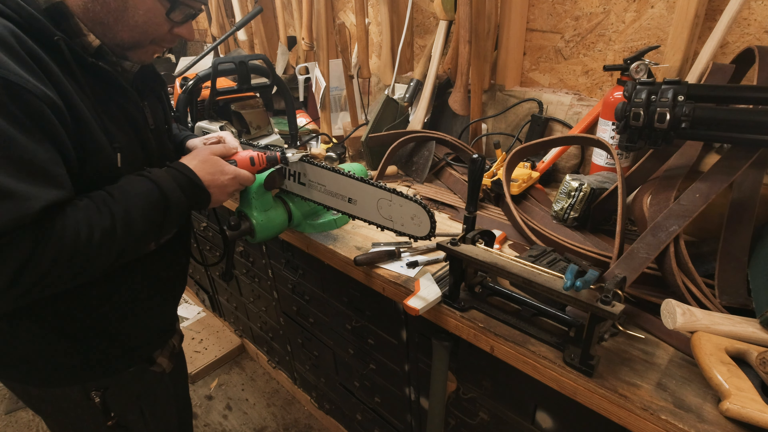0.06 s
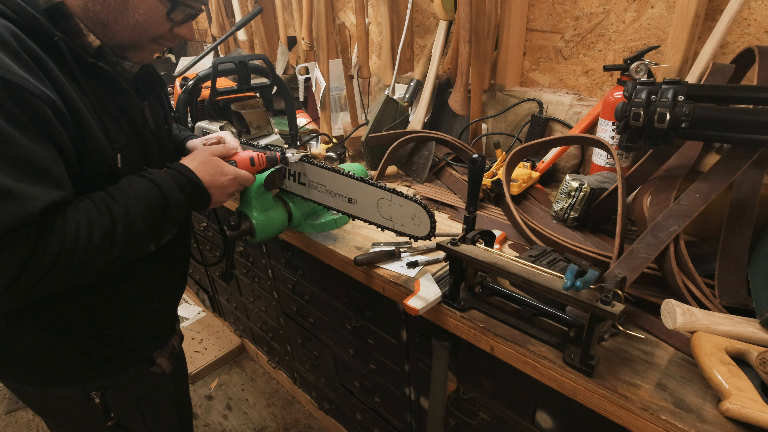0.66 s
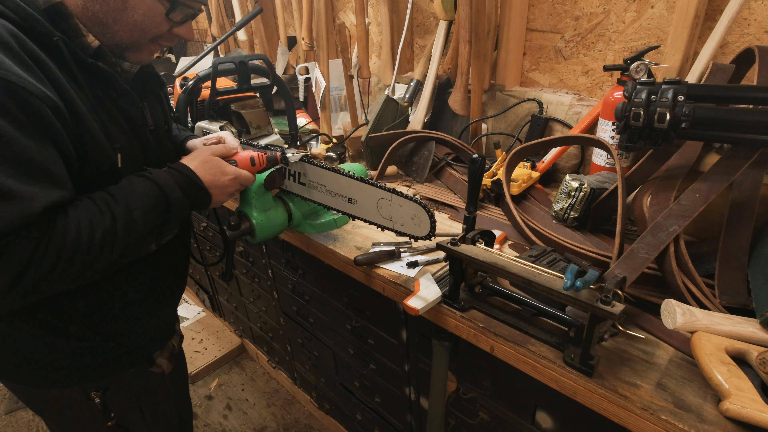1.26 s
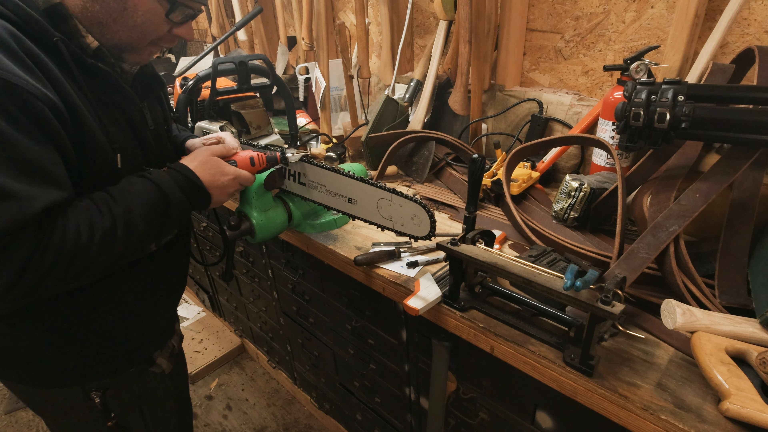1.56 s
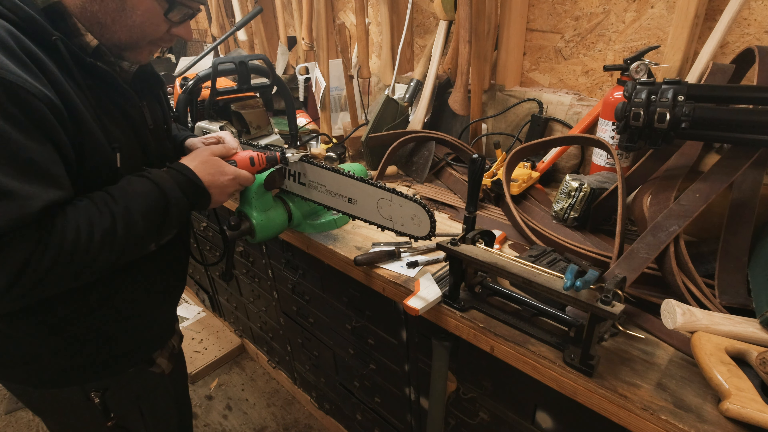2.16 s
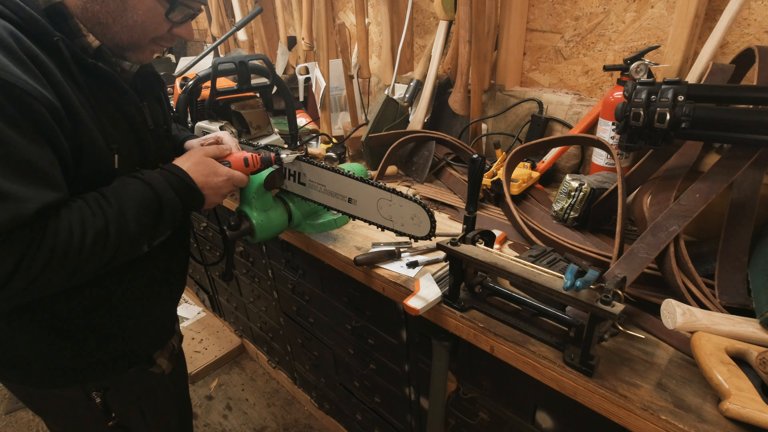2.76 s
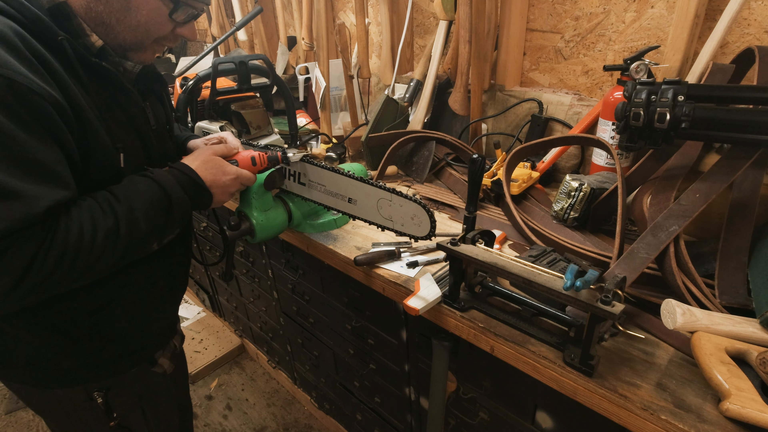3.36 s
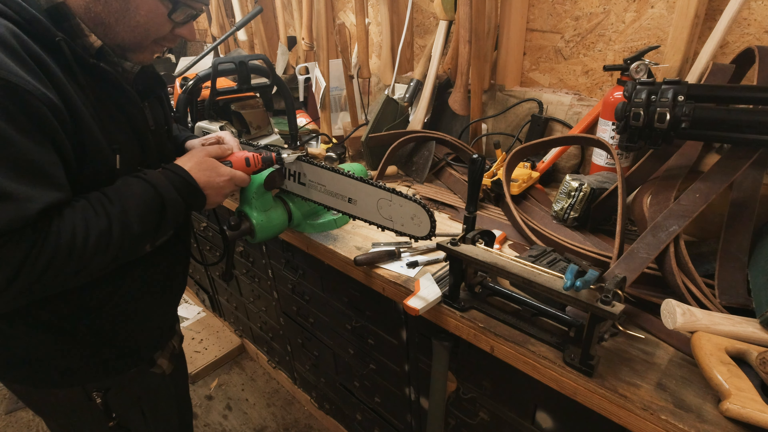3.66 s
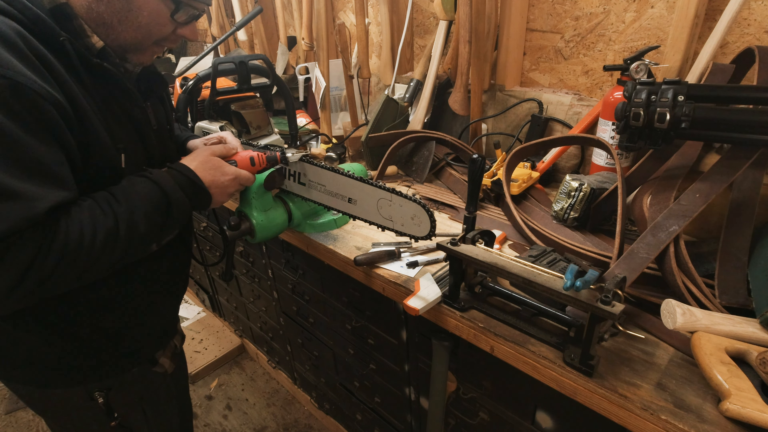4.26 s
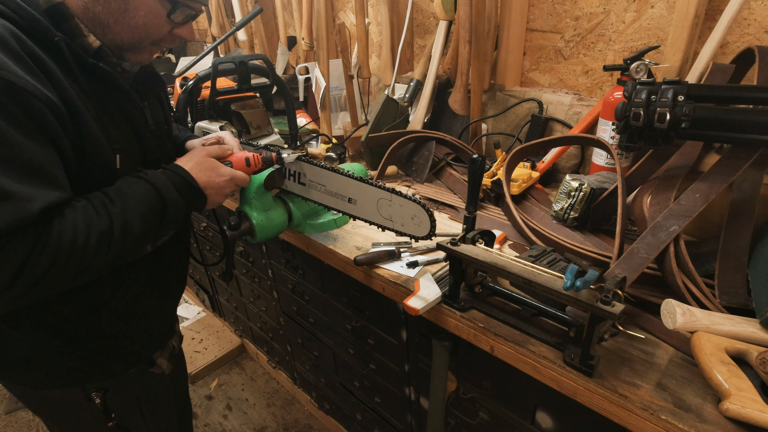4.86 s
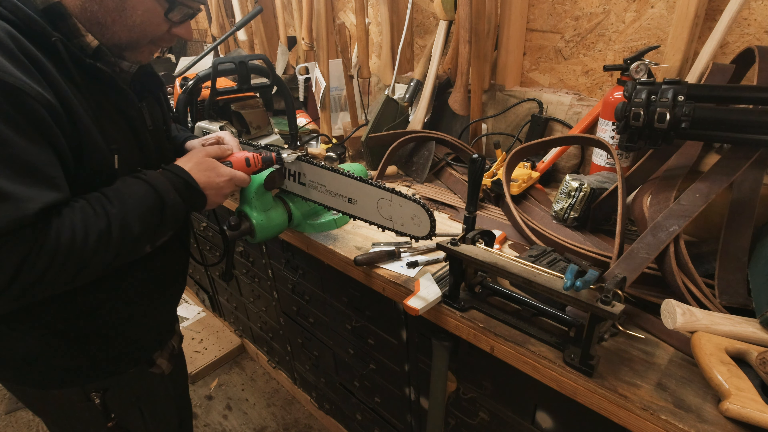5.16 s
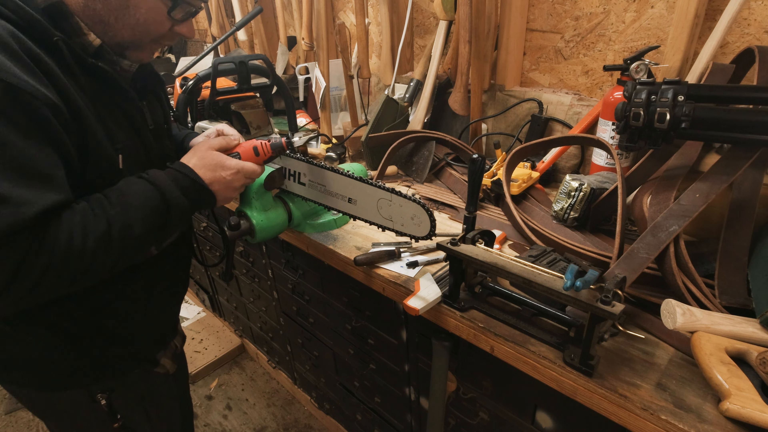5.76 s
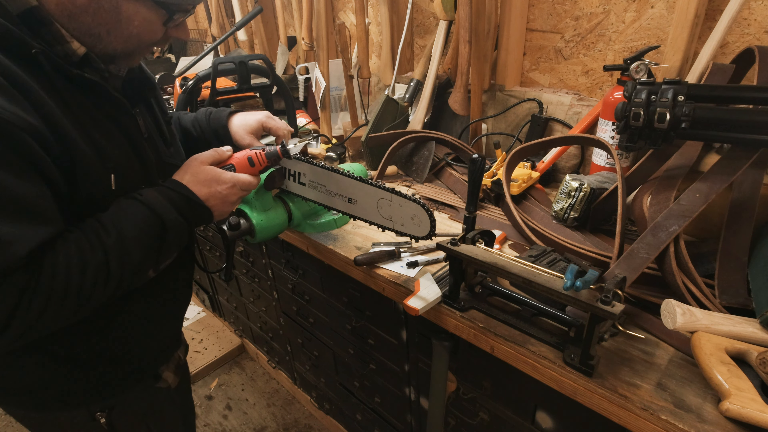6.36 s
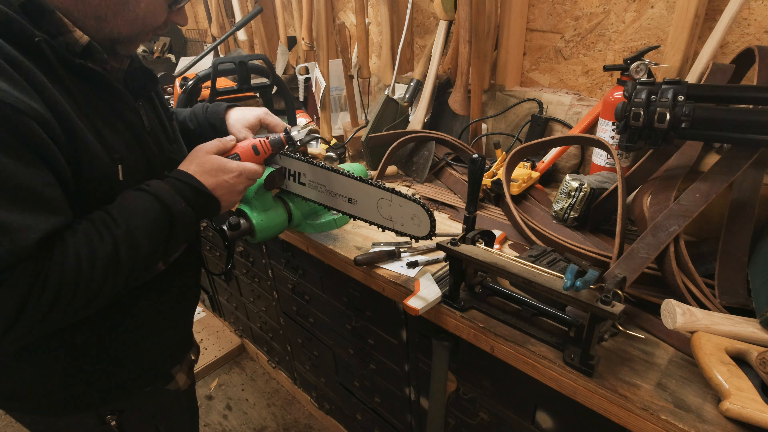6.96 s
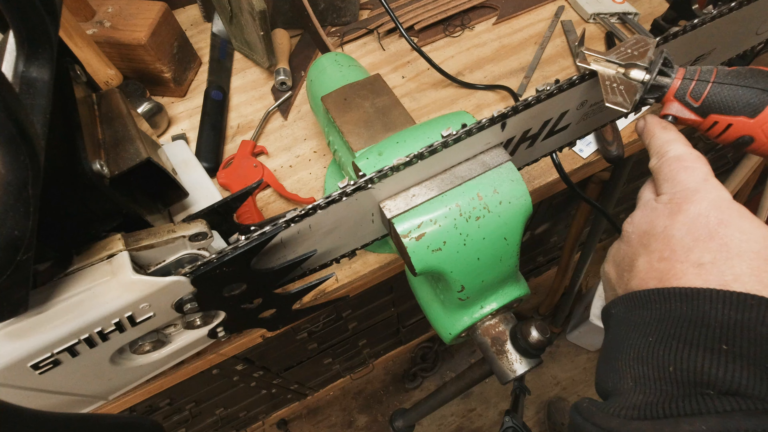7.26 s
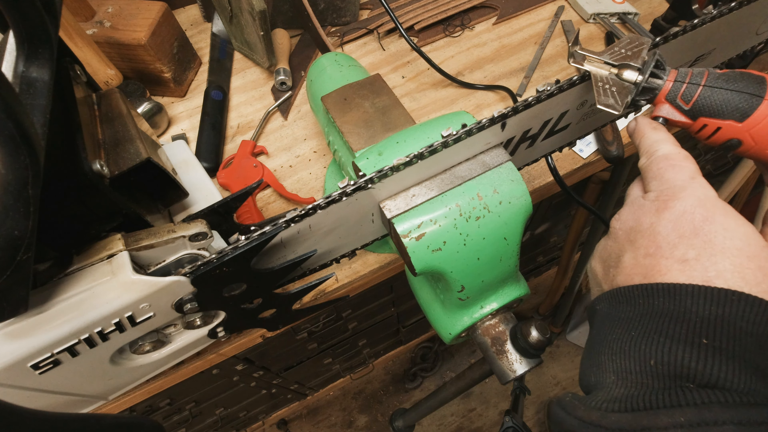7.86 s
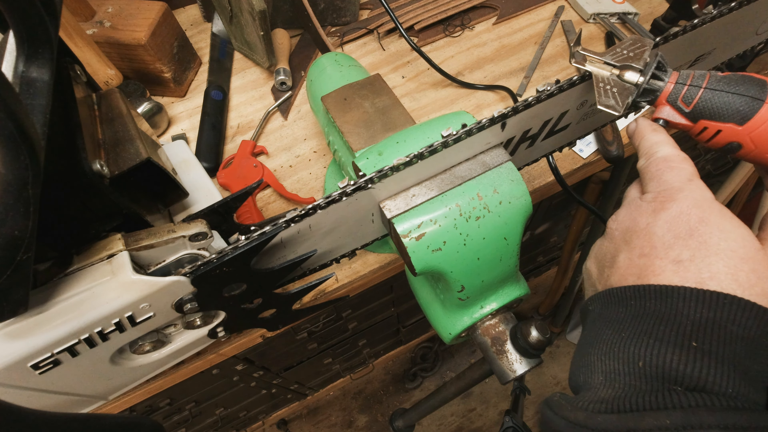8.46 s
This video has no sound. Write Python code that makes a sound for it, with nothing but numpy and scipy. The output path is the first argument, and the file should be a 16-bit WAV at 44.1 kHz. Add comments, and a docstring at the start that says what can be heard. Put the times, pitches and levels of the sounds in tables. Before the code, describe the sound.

A small rotary tool whines as its stone grinds a saw chain, rasping and squealing, lifting off to spin free and then grinding again.

```python
"""A grinding stone on a mains-powered rotary tool sharpens a saw chain, heard in mono in a wooden shed.
The chain sits in a bench vice. The stone bumps the tooth once a turn, its grit rasps, and the tooth
rings and squeals. When the stone is lifted off, the motor speeds up and whines with a mains throb
over the rush of its fan. At 7.3 s the listener jumps from beside the bench to close above the chain."""
import sys
import numpy as np
from scipy import signal
from scipy.fft import rfft, irfft, next_fast_len
from scipy.io import wavfile
from scipy.ndimage import uniform_filter1d

SR = 44100
rng = np.random.default_rng(int(sys.argv[2]) if len(sys.argv) > 2 else 0)


def wrap_up_sound(samples):
    """Save the sound to the file named by the first command line argument, as 16-bit audio."""
    columns = np.atleast_2d(samples).T
    # keep every value between -1 and 1, then stretch to whole-number steps
    tamed = np.clip(columns, -1, 1)
    steps = np.round(tamed * 32767).astype(np.int16)
    wavfile.write(sys.argv[1], SR, steps)


N = 384681
T = np.arange(N) / SR
JUMP_S = 7.3  # the listener moves above the chain


# the stone rests on a tooth: start t/s, end t/s, then level/dB of bite, ring and chatter
CONTACTS = [(0.0, 2.589, -35.5, -46.5, -38), (2.805, 5.645, -45, -48, -41.5),
            (7.378, 8.72, -35.5, -43.5, -37.5)]
# loose grit compared with the regular bumps, low while the stone runs evenly: t/s, level/dB
GRIT = [(0, 2.5), (3.0, -1), (5.65, -1.5), (7.415, -19), (7.432, 3), (7.46, -5), (7.485, -10), (7.57, -8),
        (7.61, 4.5), (8.1, 1.5), (8.7, -0.5)]
def grinding(contact, angle, mains, bump_tones, rasp_colour, wander, crowding, ring_grit,
             jolt_db, fizz_db, flutter_db, throb, thrum_db):
    """The stone grinds one tooth: bumps and rasp make a low bite, a bright ring and a fine fizz."""
    start, end, rest_bite_db, rest_ring_db, chatter_db = contact
    bite_db, ring_db = pressure(start, end, rest_bite_db, rest_ring_db)
    rattle = rattles(start, end)
    grit = undb(curves(GRIT)[0])
    unsteady = wander * np.minimum(0.87 * grit, 1)
    # the touching point wanders round the stone, which blurs the high tones most
    spot = angle + unsteady * (0.1 * walk(22) + 0.039 * walk(330))
    tones = bumps(spot, unsteady, bump_tones)
    grains = rasp(spot, angle, crowding, rasp_colour)
    scrape = (tones + grit * grains) / np.hypot(1, grit)
    bite = band(scrape, 3915, "low", order=10)
    bite *= undb(bite_db + jolt_db * rattle / rattle.max()) / np.std(band(bite, [1500, 3150], "band"))
    # pressing harder brings out the ring; the fizz grows more gently
    ring = (tones + ring_grit * grit * grains) / np.hypot(1, ring_grit * grit)
    ring = band(ring, [3620, 8300], "band", order=8)
    ring *= undb(ring_db) / np.std(band(ring, [4100, 6800], "band"))
    fizz = sizzle(scrape) * undb(0.68 * ring_db + 0.25 * bite_db + fizz_db + 0.43 * walk(400))
    bounce = chatter(spot, unsteady, rattle, chatter_db, flutter_db, 1 + throb * np.cos(mains))
    # the pressed tool passes its mains throb into the bench
    thrum = undb(thrum_db) * partial(mains + 1.7 * walk(30), waver_db=4.0, rate=14)
    return touch(start, end) * skips(start, end) * (bite + ring + fizz + bounce + thrum)


# tones of the bumping stone, from the side and from above: multiple of the turn rate, relative level/dB
BUMPS_SIDE = [(3, -1), (4, 3), (5, -1), (6, 1), (7, 5), (8, 4), (9, -1), (10, 2.5), (11, -4.5), (12, -6.5),
              (13, -6), (14, -6), (15, -6)]
BUMPS_ABOVE = [(3, -4.5), (4, -4.5), (5, -7.5), (6, 4), (7, 0.5), (8, -22), (9, -5.5), (10, -9), (11, -12),
               (12, -17), (24, -25)]
SPREAD_RAD = 0.249  # the bar carries high tones faster than low ones, which smears each bump
def bumps(spot, unsteady, bump_tones):
    """The stone's high spot hits the tooth once a turn, so fast that it makes a buzzing note."""
    buzz = 0
    for k, db in bump_tones:
        phase = round(k) * spot + SPREAD_RAD * round(k) ** 2 + 0.49 * unsteady * walk(35)
        buzz += undb(db) * partial(phase, waver_db=5.9 * unsteady, rate=32, scatter=0.29)
    return unit(buzz)


# tone colour of the rasp in chain and bar, from the side and from above: f/Hz, relative level/dB
RASP_SIDE = [(400, -26.5), (800, -13), (1150, -19.5), (2000, -10.5), (2400, -15.5), (3400, -3), (3950, -8),
             (4350, -5.5), (5000, -11.5), (5900, -8.5), (6450, -8), (6800, -16), (8000, -21.5),
             (9200, -28.5), (11200, -24.5), (12400, -29), (13400, -27.5), (15500, -38)]
RASP_ABOVE = [(400, -44), (850, -0.5), (1300, -7.5), (2200, -9), (2650, 5.5), (3100, 11), (3700, -8.5),
              (4450, 0), (4750, -5.5), (5250, -9.5), (6100, -10), (7100, -29.5), (9000, -19), (11000, -18),
              (13500, -20), (15500, -48)]
def rasp(spot, angle, crowding, rasp_colour):
    """Grains of uneven size tear at the steel, crowded round each bump."""
    grains = rng.standard_normal(N) * undb(walk(3000) + 0.81 * walk(130))
    grains *= np.exp(crowding * np.cos(spot))
    # the same grains come round again on the next turns, which gives a rough pitch
    turn_samples = 2 * np.pi / np.gradient(angle)
    grains = sum(0.4 ** k * grains[np.round(np.arange(N) - k * turn_samples).astype(int)]
                 for k in range(4))
    return unit(band(colour(steel(grains), rasp_colour), 207, "high"))


def steel(x, ring_s=0.022, share=0.41):
    """The links and the bar ring briefly at many close pitches."""
    t = T[:SR // 10]
    ringing = rng.standard_normal(len(t)) * 1000 ** (-t / ring_s)
    return unit(unit(x) + share * unit(signal.fftconvolve(x, ringing)[:N]))


def sizzle(x, flare_db=2.6, rate=13):
    """As the stone creeps along the tooth, each of its high tones flares and fades on its own."""
    edges = np.geomspace(8300, 15700, 11)
    return unit(sum(band(x, [lo, hi], "band", order=2) * undb(flare_db * walk(rate))
                    for lo, hi in zip(edges, edges[1:])))


# pushes along the tooth: hardest at t/s, half length/s, bite level/dB, ring level/dB
PUSHES = [(0.109, 0.053, -50, -35.5), (0.394, 0.1, -46, -43.5), (0.678, 0.085, -37.5, -36),
          (0.956, 0.086, -36, -33), (1.262, 0.082, -43, -33), (1.553, 0.093, -42, -33.5),
          (1.847, 0.084, -37, -32.5), (2.15, 0.086, -37.5, -31.5), (2.463, 0.07, -42, -32.5),
          (2.973, 0.16, -36, -33.5), (3.191, 0.23, -35.5, -39.5), (3.64, 0.15, -34, -51),
          (3.923, 0.31, -33, -33.5), (4.133, 0.069, -47, -35.5), (4.3, 0.17, -36, -43),
          (4.57, 0.098, -72, -36.5), (4.865, 0.2, -33, -46.5), (5.048, 0.14, -39.5, -31.5),
          (5.236, 0.19, -34, -33), (5.485, 0.22, -38, -45), (7.47, 0.061, -37, -38.5),
          (7.633, 0.3, -32.5, -56), (8.034, 0.087, -38, -36), (8.176, 0.12, -33.5, -34),
          (8.369, 0.16, -36.5, -35), (8.593, 0.078, -32.5, -34), (8.715, 0.048, -35, -33)]
def pressure(start, end, bite_db, ring_db):
    """Each push of the hand adds to the resting bite and ring; gives both levels in dB."""
    bite, ring = undb(bite_db) ** 2, undb(ring_db) ** 2
    for s, half, push_bite_db, push_ring_db in PUSHES:
        if start <= s <= end:
            push = swell(s, half)
            bite += push * undb(push_bite_db) ** 2
            ring += push * undb(push_ring_db) ** 2
    return 10 * np.log10(bite), 10 * np.log10(ring)


def touch(start, end, land_s=0.016, lift_s=0.093):
    """1 while the stone is on the tooth, 0 while it spins free."""
    return np.clip(.5 + (T - start) / land_s, 0, 1) * np.clip(.5 + (end - T) / lift_s, 0, 1)


# bouts of hard rattling: t/s, half length/s, level/dB
RATTLES = [(.01, 0.013, -33), (0.278, 0.026, -33.5), (0.49, 0.006, -29), (.567, 0.011, -31),
           (0.667, 0.023, -31), (0.775, 0.016, -27.5), (0.851, 0.016, -28.5), (0.942, 0.062, -31.5),
           (1.063, 0.013, -28.5), (1.169, 0.0086, -28.5), (1.261, 0.045, -31), (1.365, 0.023, -32),
           (1.451, 0.01, -28), (1.543, .045, -34.5), (1.668, 0.017, -30), (1.75, 0.014, -29),
           (1.85, 0.012, -36), (1.946, 0.014, -30), (2.048, 0.014, -34), (2.15, 0.029, -40.5),
           (2.274, 0.019, -29), (2.357, .022, -31.5), (2.504, 0.054, -33.5), (2.89, 0.12, -35.5),
           (3.055, 0.042, -32), (3.194, .05, -33.5), (3.3, 0.039, -28.5), (3.452, 0.11, -32),
           (3.632, 0.086, -34.5), (3.955, 0.072, -30.5), (4.158, 0.064, -35), (4.363, 0.043, -31.5),
           (4.565, 0.075, -27.5), (4.802, 0.061, -42), (4.925, 0.045, -35), (5.102, 0.16, -34.5),
           (5.31, 0.094, -32.5), (5.525, 0.026, -33), (5.622, 0.026, -37), (7.606, 0.0067, -28),
           (7.628, 0.0058, -30), (7.715, 0.13, -32.5), (8.087, 0.27, -32), (8.623, 0.11, -37)]
def rattles(start, end):
    """How hard the stone rattles in the hollow of the tooth."""
    return np.sqrt(sum(undb(db) ** 2 * swell(s, half) for s, half, db in RATTLES if start <= s <= end))


def chatter(spot, unsteady, rattle, level_db, flutter_db, mains_throb):
    """The stone bounces sideways twice a turn: a ragged flutter with the hard rattles on top."""
    flutter = unit(undb(flutter_db * np.minimum(walk(90), 1)))
    strength = np.hypot(undb(level_db) * flutter, rattle) * mains_throb
    swing = 2 * spot + 0.34 * unsteady * walk(70)
    note = unit(np.cos(swing) + undb(-9) * np.sin(2 * swing))
    return band(strength * note, 470, "high")


# short gaps in the grinding: t/s, half length/s, drop/dB
SKIPS = [(1.407, 0.022, 5.5), (7.616, 0.0039, 13)]
def skips(start, end):
    """The level dips as the stone skips off the steel for an instant."""
    return undb(-sum(drop_db * swell(s, half) for s, half, drop_db in SKIPS if start <= s <= end))


# the tooth sings: t/s, half length/s, multiple of the turn rate, level/dB
SQUEALS = [(0.68, .04, 10, -39), (1.004, .03, 10, -43), (1.28, .04, 10, -42), (1.55, 0.039, 7, -34),
           (1.845, 0.03, 10, -29.5), (2.495, 0.035, 5, -34.5), (2.864, 0.01, 7, -24), (2.965, 0.1, 9, -36),
           (2.936, 0.086, 6, -33), (3.794, 0.034, 9, -31.5), (3.842, 0.1, 5, -37), (4.002, 0.067, 9, -29),
           (5.033, 0.022, 10, -34), (5.102, 0.027, 8, -33), (5.13, 0.011, 10, -30), (5.183, 0.047, 6, -31),
           (5.234, 0.029, 10, -29), (7.396, 0.04, 6, -38), (7.522, 0.066, 6, -34), (7.525, 0.068, 7, -40),
           (7.576, 0.27, 5, -36.5), (7.68, 0.4, 4, -42), (8.045, 0.074, 9, -33.5), (8.111, 0.024, 7, -32),
           (8.114, 0.022, 6, -35), (8.193, 0.15, 8, -37), (8.206, 0.022, 7, -31), (8.52, 0.29, 3, -46),
           (8.614, 0.025, 7, -30)]
def squeals(angle):
    """The stone grabs and the tooth locks onto one note; loose grit makes it ragged."""
    ragged = np.minimum(undb(curves(GRIT)[0]), 1)
    slip = angle + ragged * (0.11 * walk(60) + 0.023 * walk(300))
    waver = unit(undb(2.1 * ragged * np.minimum(walk(140), 1)))
    notes = 0
    for s, half, k, db in SQUEALS:
        strength = undb(db) * np.exp(-np.minimum(((T - s) / half) ** 2, 20))
        notes += strength * np.cos(round(k) * slip + SPREAD_RAD * round(k) ** 2)
    return waver * notes * np.sqrt(2)


# the stone knocks as it leaves the tooth: t/s, starting level/dB
KNOCKS = [(5.6575, -34)]
def knocks(decay_s):
    """A short clack of stone on steel sets the bar ringing for a moment."""
    strikes = sum(undb(db) * (T >= s) * np.exp(-abs(T - s) / decay_s) for s, db in KNOCKS)
    bar_colour = [(600, -5), (800, 12), (1100, -7), (1800, 2), (2600, -21), (7000, -10.5), (10000, -34)]
    clack = unit(colour(rng.standard_normal(N), bar_colour))
    return band(strikes * clack, 393, "high")


# motor speed, heard from the side and then from above: t/s, turn rate f/Hz
SPEED_SIDE = [(0.0, 437), (0.57, 434.5), (0.89, 432.4), (1.06, 425.5), (1.14, 430), (1.36, 427),
              (1.48, 430.6), (1.64, 424.3), (1.74, 426.9), (2.23, 419.6), (2.37, 425), (2.54, 428.5),
              (2.64, 447), (2.86, 465), (3.02, 457.5), (3.13, 446.4), (3.33, 438.6), (3.59, 435),
              (3.86, 431.1), (4.04, 439.6), (4.26, 429.7), (4.53, 431), (4.81, 435), (5.0, 431.2),
              (5.1, 425.2), (5.19, 430.2), (5.27, 428.3), (5.37, 422.5), (5.52, 420.5), (5.64, 426.6),
              (5.81, 451), (6.13, 475.4), (6.35, 485.6), (6.74, 497.4), (7.29, 507)]
SPEED_ABOVE = [(7.305, 489.7), (7.609, 491.5), (8.021, 486.3), (8.315, 475), (8.66, 472.3)]
def motor_spin():
    """The shaft's turns per second, and its angle with a slight wobble in speed."""
    hz, = curves(list(SPEED_SIDE) + list(SPEED_ABOVE))
    return hz, 2 * np.pi * np.cumsum(hz * (1 + 0.00076 * walk(25))) / SR


# hum of the shaft: t/s, level/dB
HUM = [(0, -44), (2.15, -41.5), (2.6, -50), (3.04, -43), (4.7, -48.5), (5.25, -45.5), (5.7, -50),
       (6.6, -41.5), (7.3, -40.5), (7.45, -43), (8.72, -47)]
def shaft_hum(angle, loaded):
    """The unbalanced shaft shakes once a turn; its level wavers more while grinding."""
    strength = undb(curves(HUM)[0] + 2.6 * loaded * walk(9.9))
    return strength * partial(angle + 0.077 * walk(70), waver_db=0.36, rate=61)


# whine of the motor's spinning core: t/s, level/dB
WHINE = [(0, -36), (2.5, -37), (2.65, -34.5), (2.8, -32), (2.95, -38), (3.27, -30), (3.55, -35),
         (4.7, -34.5), (5.2, -31.5), (5.6, -37.5), (5.78, -33.5), (5.9, -47), (6.25, -37), (7.3, -40),
         (8.72, -74)]
def motor_whine(angle, hz, above, loaded, mains):
    """The core whines at eight times the turn rate and throbs as the magnetic pull swells."""
    depth = 1 - 0.65 * above
    throb = np.exp(depth * np.cos(mains)) / np.sqrt(np.i0(2 * depth))
    # the throb adds a tone on each side; the one nearer the motor's main resonance is stronger
    lean = .5 * np.tanh((3640 - 8 * hz) / 220)
    note = partial(8 * angle + lean * np.sin(mains), waver_db=2.0 + 2.1 * loaded, rate=25)
    return undb(curves(WHINE)[0]) * throb * note


# weaker tones of fan and core: multiple of the turn rate, base level/dB
MOTOR_TONES = [(2, -54), (3, -55), (4, -52.5), (6, -59), (11, -64), (15, -72), (16, -60), (18, -65),
               (29, -77), (31, -74.5), (32, -77), (33, -79)]
# pitches that the plastic housing makes louder: f/Hz, width/Hz, boost/dB
HOUSING = [(2064, 310, 7.5), (2990, 220, 7.5), (4950, 560, 14.5), (8900, 1000, 4.5), (13100, 800, 10)]
def motor_tones(angle, hz, above, loaded, mains, fade_db_per_s=1):
    """Fan, core and bearings sing through the housing, louder with speed and damped by grinding."""
    balls, outer = 7, 2.635  # outer: balls passing a point on the bearing's outer ring each turn
    inner = balls - outer
    bearing = [(outer, -56.5), (inner, -53.0), (2 * inner + 1, -68.5)]
    tones = 0
    for k, db in [(round(k), db) for k, db in MOTOR_TONES] + bearing:
        boost_db = sum(peak / (1 + (2 * (k * hz - centre) / width) ** 4)
                       for centre, width, peak in HOUSING)
        tones += undb(db + boost_db + shed(k * hz)) * partial(k * angle, waver_db=2.6, rate=17)
    fade_db = fade_db_per_s * (T - JUMP_S) * above  # from above, the tones slowly get quieter
    damping_db = 2.0 * loaded * (2 - above)
    return tones * (hz / 495) ** 2 * (1 + 0.038 * np.cos(mains)) * undb(-fade_db - damping_db)


# tone colour of the cooling air: f/Hz, relative level/dB
AIR = [(30, -28), (130, -11.5), (380, 1), (900, 5), (1200, -3), (2100, 4.5), (2600, -6.5), (4300, -3),
       (5900, -9.5), (6700, -17.5), (9500, -23), (15500, -27)]
def fan_air(hz, above):
    """The fan's rush grows with speed and is duller from above."""
    rush = unit(colour(rng.standard_normal(N), AIR))
    rush *= undb(-41.0 + 0.73 * walk(12)) * (hz / 495) ** 3.1
    dull = colour(rush, [(60, -18.0), (700, 1.5), (2500, 3.5), (9000, -10)])
    return rush * (1 - above) + dull * above


def shed(hz, spacing_hz=112.2):
    """Gain in dB of a tone gliding through the shed's peaks and dips, which blur in the bass."""
    grid = np.arange(0, SR / 2, spacing_hz)
    heights = rng.uniform(-0.46, 1, size=1024)[:len(grid)]
    return 6 * np.interp(hz, grid, heights) * np.minimum(hz / 6000, 2)


def partial(angle, waver_db, rate, scatter=1):
    """A tone with deep dips and gentle swells. Tones with little scatter line up into pulses."""
    strength = undb(waver_db * np.minimum(walk(rate), 1))
    return unit(strength * np.cos(angle + scatter * rng.uniform(-np.pi, np.pi)))


def walk(rate):
    """A random drift of typical size 1, with about `rate` new values a second."""
    hold = max(int(SR / rate), 1)
    knots = rng.standard_normal((N // hold + 2, 1))
    ramps = knots[:-1] + np.diff(knots, axis=0) * np.arange(hold) / hold
    return 1.22 * ramps.ravel()[:N]


def swell(s, half):
    """A bell shape with a slightly flat top, reaching 1 at time s."""
    shape, near = np.zeros(N), abs(T - s) < 4 * half
    shape[near] = np.exp(-2 * (abs(T[near] - s) / half) ** 2.2)
    return shape


def curves(rows):
    """Turn each column after the time into a value per sample."""
    s, *columns = np.transpose(rows)
    return [np.interp(T, s, c) for c in columns]


def colour(x, points):
    """Filter by a curve through (f/Hz, level/dB) points."""
    hz, db = np.transpose(points)
    size = next_fast_len(N)
    f = np.maximum(np.fft.rfftfreq(size, 1 / SR), 1)
    gain = undb(np.interp(np.log(f), np.log(hz), db))
    return irfft(rfft(x, size) * gain, size)[:N]


def band(x, edges, kind, order=4):
    """Keep the lows, the highs or a band, without delay."""
    return signal.sosfiltfilt(signal.butter(order, edges, kind, fs=SR, output="sos"), x)


def undb(db):
    """Decibels to gain."""
    return 10 ** (np.asarray(db) / 20)


def unit(x):
    """Scale to an average strength (rms) of 1."""
    return x / np.sqrt(np.mean(x ** 2))


def scene():
    """One turning shaft drives the stone and the motor's sounds."""
    hz, angle = motor_spin()
    mains = 2 * np.pi * 120 * T  # the magnetic pull swells twice in each mains cycle
    spindle = angle + 0.025 * np.sin(mains)  # this twists the spindle back and forth
    above = uniform_filter1d(1. * (T > JUMP_S), 200)  # 0 from the side, 1 from above
    loaded = sum(touch(start, end) for start, end, *_ in CONTACTS)
    *from_side, from_above = CONTACTS
    stone = sum(grinding(contact, spindle, mains, BUMPS_SIDE, RASP_SIDE, wander=1.23, crowding=0.18,
                         ring_grit=0.69, jolt_db=1.5, fizz_db=-17.0, flutter_db=8.5, throb=0.057,
                         thrum_db=-71) for contact in from_side)
    stone += grinding(from_above, spindle, mains, BUMPS_ABOVE, RASP_ABOVE, wander=0.67, crowding=0.53,
                      ring_grit=1.14, jolt_db=2.0, fizz_db=-24.5, flutter_db=1.5, throb=0.19,
                      thrum_db=-79.5)
    tool = shaft_hum(angle, loaded) + motor_whine(angle, hz, above, loaded, mains)
    tool += motor_tones(angle, hz, above, loaded, mains) + fan_air(hz, above)
    mono = stone + loaded * squeals(spindle) + knocks(decay_s=0.028) + tool
    return np.array([mono, mono])


def record(dry):
    """Round off the highest peaks and cut the treble above 15700 Hz."""
    rounded = dry / (1 + (dry / .28) ** 4) ** .25
    return signal.sosfilt(signal.ellip(12, .1, 80, 15700, fs=SR, output="sos"), rounded)


dry = scene()
out = record(dry)
wrap_up_sound(out)
```